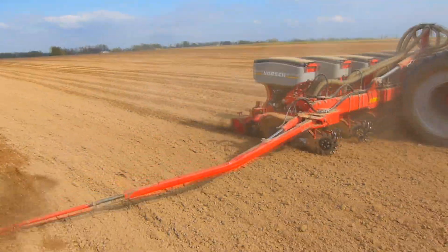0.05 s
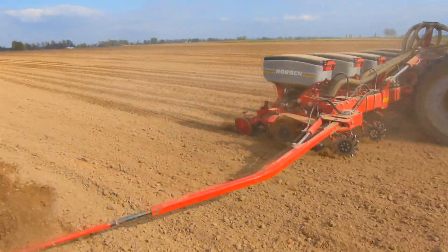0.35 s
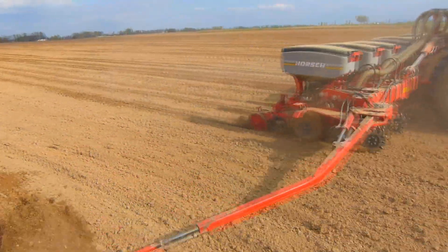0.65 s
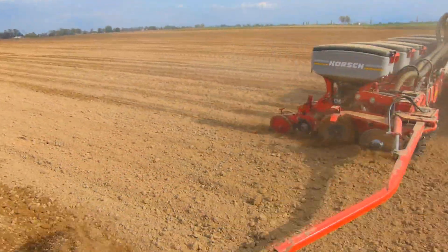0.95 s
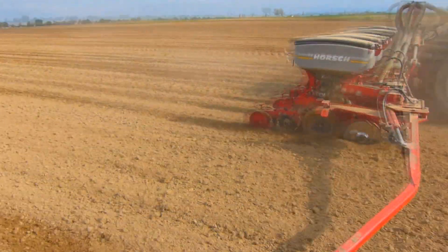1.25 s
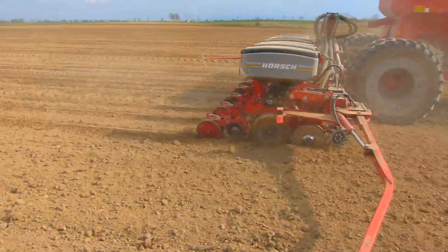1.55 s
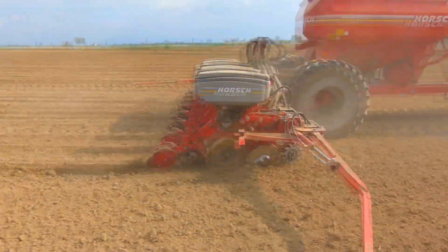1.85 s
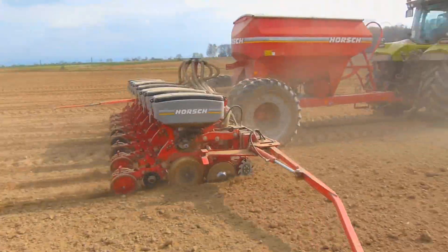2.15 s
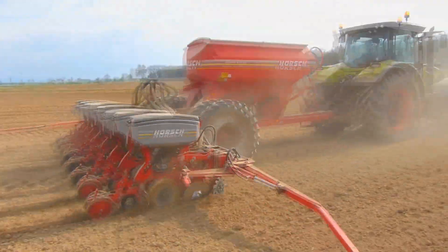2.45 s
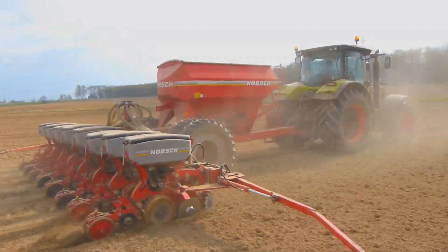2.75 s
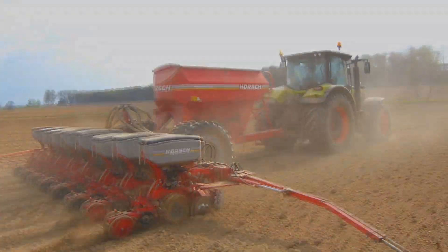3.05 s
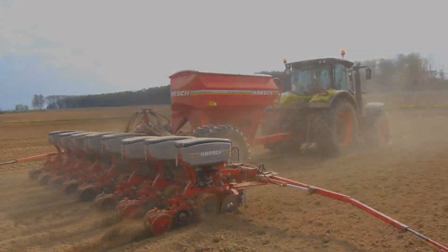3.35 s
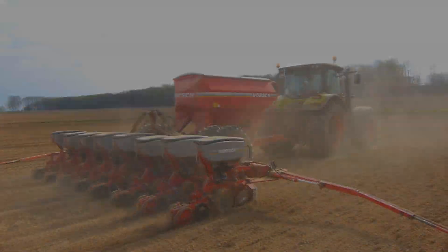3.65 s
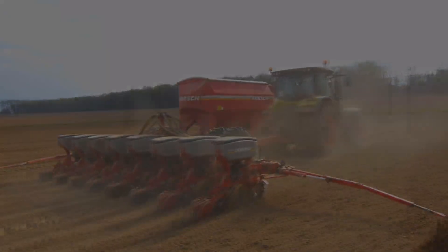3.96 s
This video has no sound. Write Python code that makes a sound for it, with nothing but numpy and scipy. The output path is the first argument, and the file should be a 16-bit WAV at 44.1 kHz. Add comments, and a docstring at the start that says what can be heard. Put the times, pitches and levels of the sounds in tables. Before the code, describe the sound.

A diesel tractor throbs with a deep rumble, towing a planter off into the distance.

```python
"""Tractor and seed planter drawing away

A diesel throbs as its firings ring the exhaust, over a deep rumble of heavy wheels and wind.
The planter's frame drums over clods, its hoppers boom and its discs hiss through dry, crumbling soil.
The seed blower whines; a loaded drive holds its tones, then drops off at once. The whole rig fades away."""
import sys
import numpy as np
from scipy import signal
from scipy.fft import rfft, irfft
from scipy.io import wavfile
from scipy.ndimage import uniform_filter1d

SR = 44100
rng = np.random.default_rng(int(sys.argv[2]) if len(sys.argv) > 2 else 0)


def unload_wav(signal):
    """Save mono or channel-first audio to the path in sys.argv[1] as 16-bit WAV at rate SR, clipped to [-1, 1]."""
    wavfile.write(
        sys.argv[1],
        SR,
        np.round(np.clip(np.atleast_2d(signal).T, -1, 1) * 32767).astype(np.int16),
    )


N = 176400

# Exhaust resonances: pitch_hz, width_hz, relative_db
EXHAUST_MODES = [(75.6, 32, -3.5), (147.73, 15, 1.5), (372, 25, -24)]
# Engine fader: time_s, level_db
ENGINE_FADE = [(0, -34.5), (.65, -40), (1.2, -44.5), (1.8, -53.5), (2.55, -49), (3.1, -61.5), (3.55, -64),
               (4.0, -61.5)]
# Weight of wheels and wind: frequency_hz, relative_db
RUMBLE_EQ = [(12, -33), (24, -18), (33, -5.5), (45, 3.5), (58, 4), (86, 3), (112, -3), (135, -10.5),
             (200, -18.5), (400, -66.5), (2000, -120)]
# Rumble fader: time_s, level_db
RUMBLE_FADE = [(0, -29), (.13, -28), (.24, -30), (.62, -31.5), (.76, -37.5), (.92, -32.5), (1.06, -40),
               (1.36, -38), (1.5, -37), (1.88, -38.5), (2.15, -45.5), (2.85, -45.5), (3.1, -50),
               (3.3, -49.5), (4.0, -57.5)]
# Brief bumps in the rumble: peak_s, boost_db
RUMBLE_SURGES = [(1.49, 7.2), (2.53, 4.6), (3.18, 3)]
# Body of the drumming frame: frequency_hz, relative_db
FRAME_EQ = [(70, -28), (125, 3.5), (170, -2), (235, -3.5), (280, -9.5), (390, -12), (520, -20),
            (660, -20.5), (850, -31), (1400, -37), (3000, -90), (9000, -110)]
# Frame fader: time_s, level_db
FRAME_FADE = [(0, -34), (.2, -38), (.7, -41.5), (1.2, -44.5), (1.9, -50.5), (2.25, -55), (2.7, -57.5),
              (3.2, -64), (4.0, -72)]
# Hollow hopper resonances: pitch_hz, width_hz, relative_db
HOPPER_MODES = [(178.7, 40, -0.5), (251.4, 30, -4), (300.3, 35.6, -9)]
# Soil hiss, its body and then its top end: frequency_hz, relative_db
SOIL_BODY_EQ = [(300, -8), (700, 4), (1150, 1.5), (1700, -1), (2800, -3.5), (4000, -7.5), (5200, -12),
                (7000, -20)]
SOIL_TOP_EQ = [(8500, -26), (11000, -34), (15000, -48)]
# Soil fader: time_s, level_db
SOIL_FADE = [(0, -51.5), (.2, -52.5), (.7, -57.5), (1.25, -62.5), (2.0, -69), (2.7, -75.5), (3.3, -81),
             (4.0, -89)]
# Blower whine partials: pitch_hz, relative_db
BLOWER_PARTIALS = [(374.4, 5), (496, 3), (607, -.5), (1336.5, -1.5), (1130, -9), (1575, -12), (1986, -13),
                   (2234, -14), (2541, -14), (2902, -14)]
# Blower fader: time_s, level_db
BLOWER_FADE = [(0, -64.5), (.8, -68.5), (1.2, -77.5), (1.7, -84), (2.4, -92.5), (4.0, -108)]
# Upper tones of the drive: pitch_hz, relative_db, left_over_right_db
DRIVE_UPPER_TONES = [(823, -7, -4), (975.5, 0, -2.5)]
# Faders for the drive's main and upper tones, with the sudden drop: time_s, level_db
DRIVE_MAIN_FADE = [(0, -67.5), (.85, -67.5), (1.1, -66.5), (1.45, -64.3), (1.95, -66), (2.667, -65.8),
                   (2.677, -79), (3.15, -85), (3.35, -95), (4.0, -98)]
DRIVE_UPPER_FADE = [(0, -68), (.9, -73.5), (1.45, -70.5), (2.1, -73), (2.667, -75.5), (2.677, -85.5),
                    (3.1, -86.5), (3.4, -97), (4.0, -102)]
# Nearly flat bed of air: frequency_hz, relative_db
AIR_EQ = [(100, 3), (1000, 3.5), (4000, 3.5), (8000, 4.5), (12000, 3), (15000, 0)]


def undb(db):
    """Decibels to gain."""
    return 10 ** (np.asarray(db) / 20)


def unit(x):
    """Scale to rms 1."""
    return x / np.sqrt(np.mean(x ** 2))


def seconds():
    """Time of each sample."""
    return np.arange(N) / SR


def fader(rows):
    """Gain over time from rows of time_s, level_db."""
    return undb(np.interp(seconds(), *np.array(rows).T))


def pan(db):
    """Stereo gains with the left louder by db."""
    return undb(np.array([[db], [-db]]) / 2)


def equalise(x, points):
    """Shape the tone by rows of frequency_hz, relative_db; rms 1."""
    hz, db = np.array(points).T
    bins_hz = np.maximum(np.arange(N // 2 + 1) * SR / N, 1)
    gain = undb(np.interp(np.log(bins_hz), np.log(hz), db))
    return unit(irfft(rfft(x) * gain, N))


def drift(rate_hz):
    """Smooth random movement up to about rate_hz; rms 1."""
    bins_hz = np.arange(N // 2 + 1) * SR / N
    smoothing = np.exp(-(bins_hz / rate_hz) ** 2) * (bins_hz > 0)
    return unit(irfft(rfft(rng.standard_normal(N)) * smoothing, N))


def wide_noise(shared):
    """Stereo noise with a share of its power common to both sides."""
    return np.sqrt(1 - shared) * rng.standard_normal((2, N)) + np.sqrt(shared) * rng.standard_normal(N)


def ring(x, hz, width_hz):
    """A resonance, applied twice for steep skirts."""
    b, a = signal.iirpeak(hz, hz / width_hz, fs=SR)
    return signal.lfilter(b, a, signal.lfilter(b, a, x))


def tone(hz, flutter, rate_hz):
    """A sine whose level and phase flutter separately on each side."""
    wobble = np.array([drift(rate_hz) + 1j * drift(rate_hz) for _ in range(2)]) / np.sqrt(2)
    carrier = np.exp(2j * np.pi * np.cumsum(hz) / SR)
    return unit(np.real((1 + flutter * wobble) * carrier))


def engine(firing_hz=73.65, scatter_db=4, right_lag_s=0.0023):
    """Uneven diesel firings ring the exhaust; moving air makes each side waver."""
    cycles = np.cumsum(firing_hz * (1 + 0.0064 * drift(2.7))) / SR
    firings = np.flatnonzero(np.diff(np.floor(cycles)))
    sides = []
    for lag in (0, int(right_lag_s * SR)):
        pulses = np.zeros(N)
        pulses[firings] = undb(scatter_db * rng.standard_normal(N)[:len(firings)])
        pipe = sum(undb(db + 1.2 * drift(18)) * ring(pulses, hz, width) for hz, width, db in EXHAUST_MODES)
        sides.append(np.roll(pipe, lag))
    return unit(np.array(sides)) * fader(ENGINE_FADE)


def rumble(surge_s=0.017):
    """Heavy wheels and wind fill the low end, with a few brief surges."""
    low = equalise(wide_noise(shared=0.069), RUMBLE_EQ)
    levelled = low / np.sqrt(uniform_filter1d(low ** 2, size=SR // 6, axis=1))
    surges_db = sum(db * np.exp(-((seconds() - peak_s) / surge_s) ** 2) for peak_s, db in RUMBLE_SURGES)
    return levelled * undb(surges_db) * fader(RUMBLE_FADE) * pan(db=1.56)


def frame():
    """The planter's frame drums as it jolts over clods."""
    jolts = undb(1.22 * drift(16))
    drumming = equalise(wide_noise(shared=0.045) * jolts, FRAME_EQ)
    return drumming * fader(FRAME_FADE) * pan(db=0.96)


def hoppers(start_db=-43.5, fade_db_per_s=7):
    """The shaken hoppers boom in a few broad resonances that carry far."""
    shake = wide_noise(shared=0.05)
    boom = sum(unit(ring(shake, hz, width)) * undb(db) for hz, width, db in HOPPER_MODES)
    return unit(boom) * undb(start_db - fade_db_per_s * seconds())


def soil(crumbs_per_s=2000, size_spread_db=4.5, crumb_mix_db=-5.5):
    """Discs slice dry earth: a hiss, gritty with falling crumbs."""
    sizes = undb(size_spread_db * np.minimum(rng.exponential(size=(2, N)), 6))
    landings = rng.random((2, N)) < crumbs_per_s / SR
    crumbs = landings * sizes * np.sign(rng.standard_normal((2, N)))
    scrape = wide_noise(shared=0.024) + undb(crumb_mix_db) * unit(crumbs)
    flicker = undb(0.51 * drift(14))
    return equalise(scrape * flicker, SOIL_BODY_EQ + SOIL_TOP_EQ) * fader(SOIL_FADE) * pan(db=0.8)


def blower():
    """The seed blower's whine flutters and fades with distance."""
    speed = 1 + 0.00071 * drift(4.2)
    whine = sum(tone(hz * speed, flutter=0.84, rate_hz=11) * undb(db) for hz, db in BLOWER_PARTIALS)
    return whine * fader(BLOWER_FADE) * pan(db=4.5)


def drive(pitch_hz=662.3):
    """A loaded drive holds one firm tone with weaker, wavering ones above; then the level drops sharply."""
    speed = 1 + 0.00046 * drift(5.6)
    main = tone(pitch_hz * speed, flutter=0.09, rate_hz=4.5) * pan(db=4.2)
    upper = sum(tone(hz * speed, flutter=0.4, rate_hz=2.7) * undb(db) * pan(side_db)
                for hz, db, side_db in DRIVE_UPPER_TONES)
    return main * fader(DRIVE_MAIN_FADE) + upper * fader(DRIVE_UPPER_FADE)


def air(level_db=-82.5):
    """A faint, even hiss behind everything."""
    return equalise(wide_noise(shared=0.05), AIR_EQ) * undb(level_db) * pan(db=-1.5)


def scene():
    """A bed of air with the receding tractor and planter on top."""
    return air() + engine() + rumble() + frame() + hoppers() + soil() + blower() + drive()


def record(dry, cutoff_hz=15100):
    """A steep low-pass trims the very top of the mix."""
    return signal.sosfilt(signal.ellip(10, 0.1, 80, cutoff_hz, fs=SR, output="sos"), dry)


dry = scene()
out = record(dry)
unload_wav(out)
```